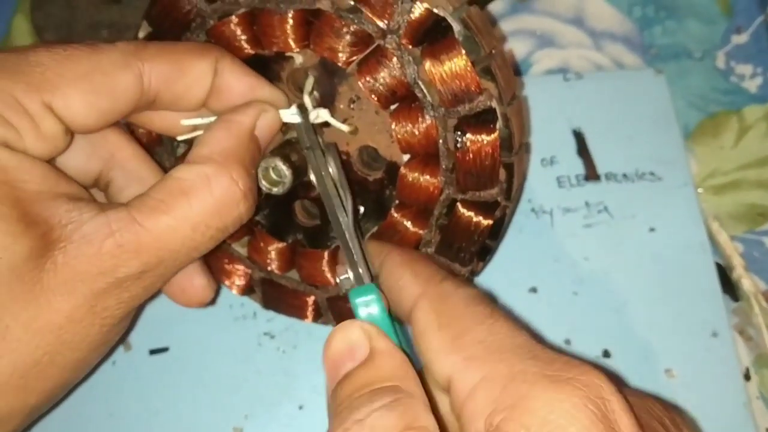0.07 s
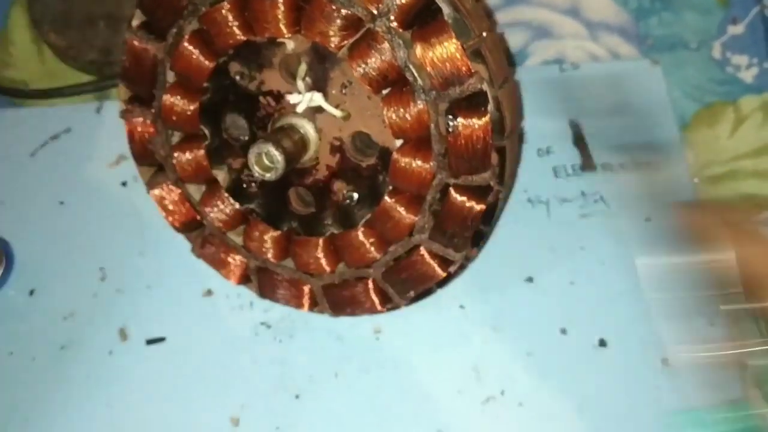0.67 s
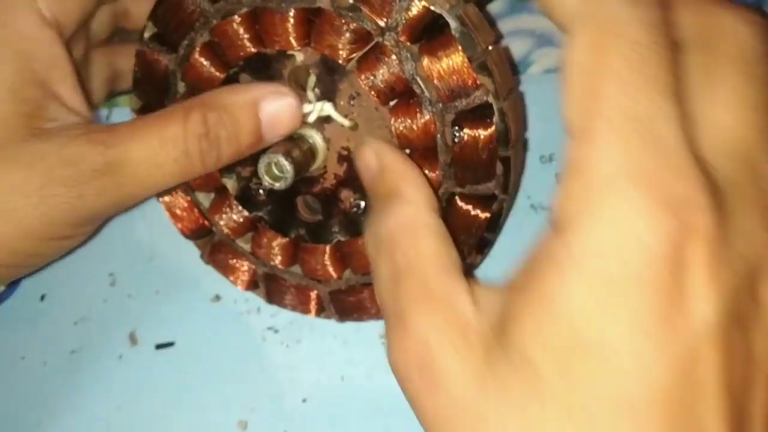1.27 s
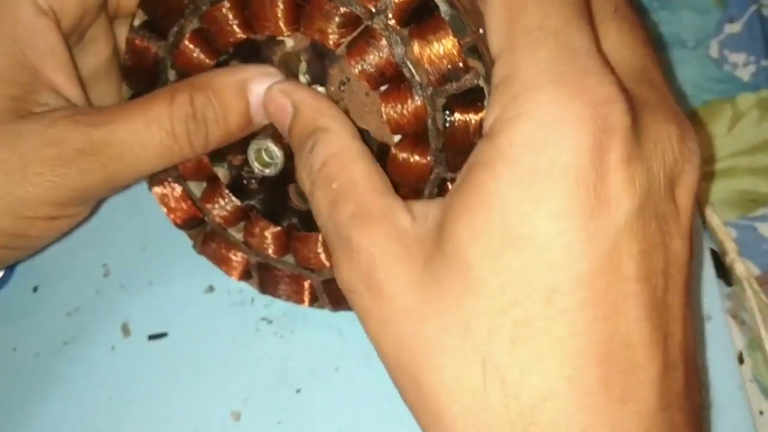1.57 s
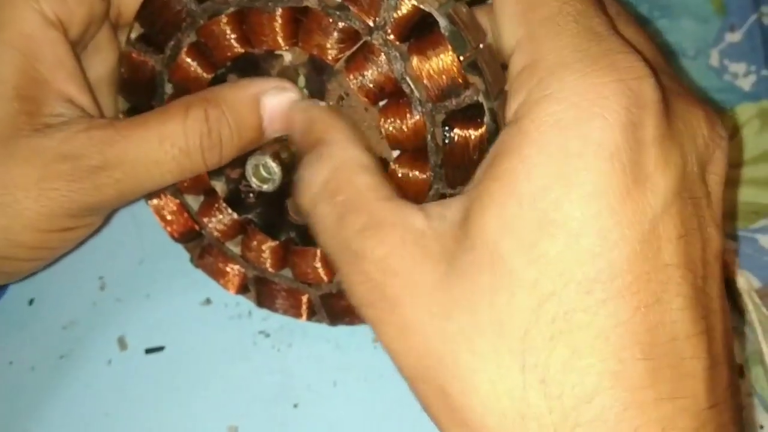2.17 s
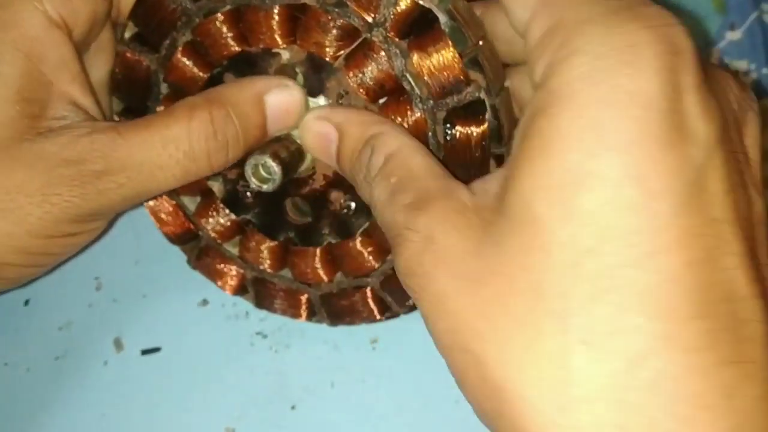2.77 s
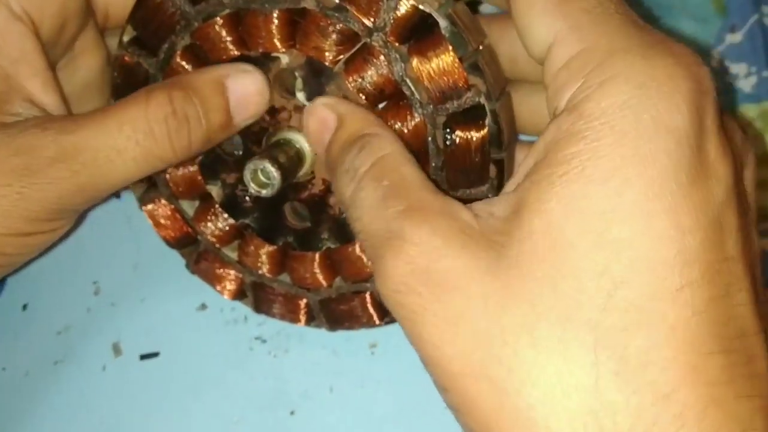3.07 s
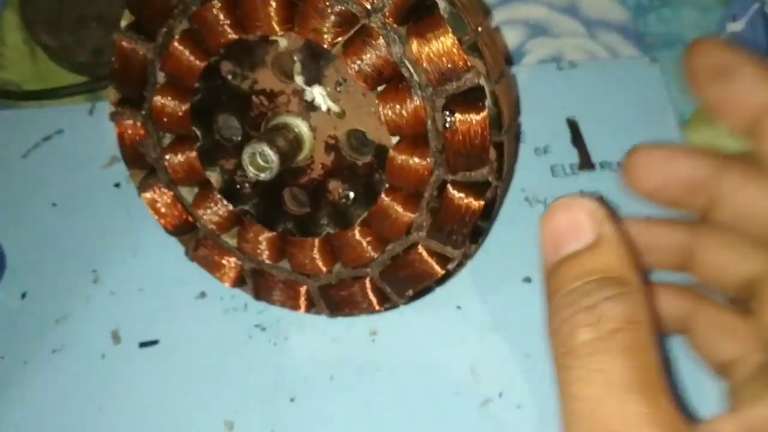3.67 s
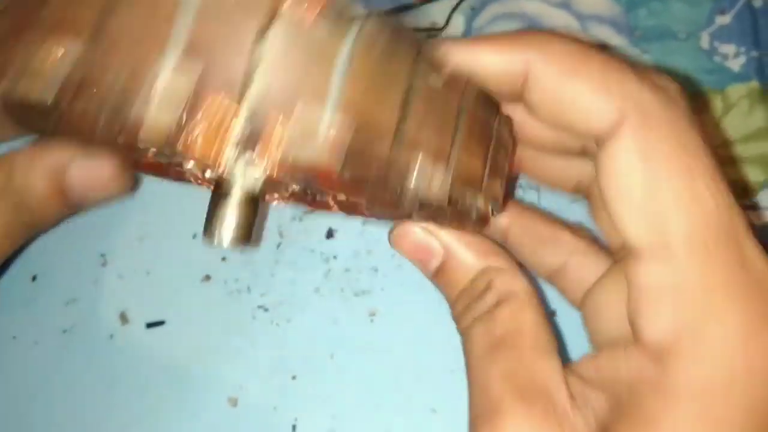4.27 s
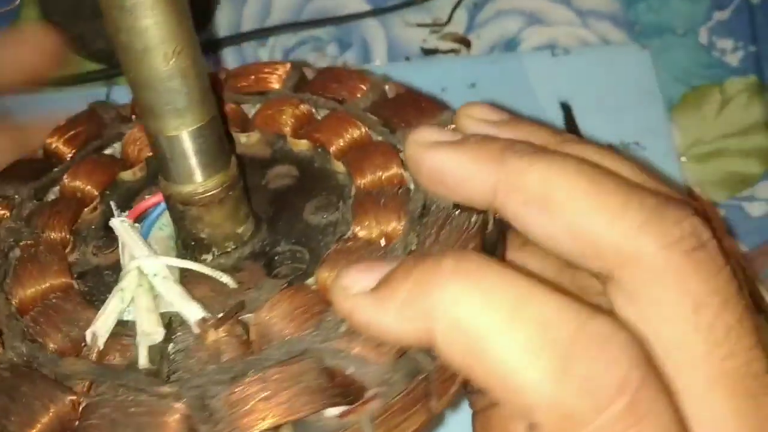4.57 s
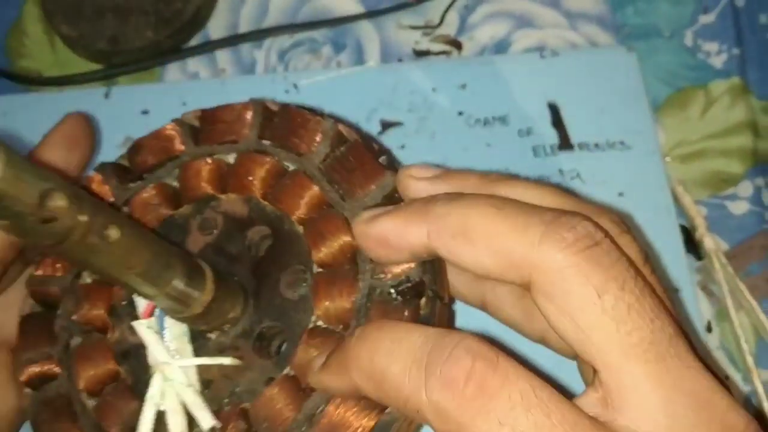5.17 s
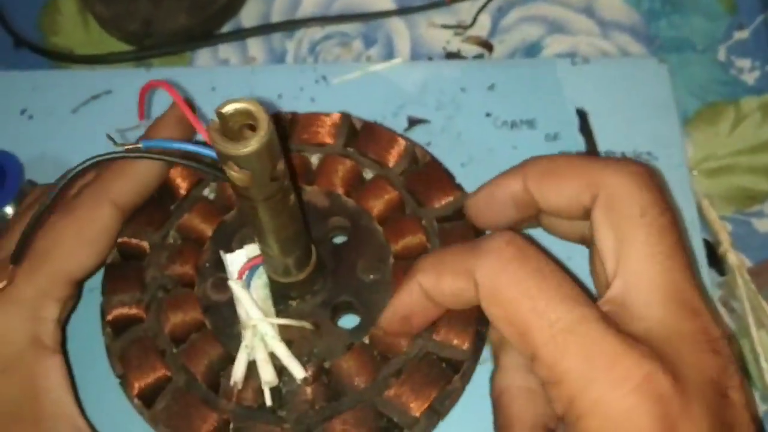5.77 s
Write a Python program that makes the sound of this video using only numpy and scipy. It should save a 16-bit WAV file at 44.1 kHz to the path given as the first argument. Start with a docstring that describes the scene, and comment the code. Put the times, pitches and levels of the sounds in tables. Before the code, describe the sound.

A few crisp scissor snips cut through a tie, and the scissors clatter onto a table with a low boom. Light taps, nail clicks and skin scuffs follow as a metal motor part is handled, clinks and is set down with a double thud. Everything is heard up close in stereo in a bare room, over dull far-off thumps, a faint wall clock and soft hiss.

```python
"""A table in a bare room, a stereo pair of microphones close to the work. First scissors snip and saw
through a tie on a fan motor's stator; at 1 s they drop on the table, which booms. Fingers press the
knot. From 4 s the stator is turned over, its steel core clinking; at 5.6 s it is set down and rocks
once. The room rings after the contacts. Throughout, dull thumps come from further off and a wall
clock ticks once a second, over low room rumble and microphone hiss."""
import sys
import numpy as np
from scipy import signal
from scipy.fft import rfft, irfft, next_fast_len
from scipy.io import wavfile
from scipy.ndimage import uniform_filter1d

SR = 44100
rng = np.random.default_rng(int(sys.argv[2]) if len(sys.argv) > 2 else 0)


def generate_wav(signal):
    """Clip the signal to [-1, 1] and save it as 16-bit WAV at the path in sys.argv[1]."""
    frames = np.transpose(np.atleast_2d(signal))
    scaled = np.clip(frames, -1, 1) * 32767
    pcm = np.round(scaled).astype(np.int16)
    wavfile.write(sys.argv[1], SR, pcm)


N = 265614
EVENT_SAMPLES = SR * 3 // 4  # one contact and its decay
T = np.arange(EVENT_SAMPLES) / SR

# the blades close on the cord: (time [s], level [dB], bite into the cord [dB])
BLADE_CLOSINGS = [(0.0952, -30.5, -16), (0.1730, -25, -18), (0.3798, -32, 0), (0.571, -32.5, -4.5)]
# the scissors touch the table, fall flat and bounce: (time [s], level [dB], room send [dB])
SCISSOR_DROPS = [(0.974, -30.5, 8), (0.989, -14, -3.5), (1.051, -37.5, 5)]
# hard knocks, one far off in the room, then the stator on the table:
# (time [s], level [dB], crack [dB], weight [dB], room [dB], ring [dB])
HARD_KNOCKS = [(1.877, -49.5, 0, -2, 9, -32), (4.094, -41, -6, -12, -8, -18),
               (4.2587, -25, 1.5, -16, -6.5, -20), (4.3336, -44, -1, -6, -25, -18),
               (4.602, -48, -10, -0.5, -10, -22), (5.5607, -27, -3, 6.5, -5, -10)]
# nails and wire ends on the stator: (time [s], level [dB], tilt [dB/octave], length [s], ring [dB])
NAIL_FLICKS = [(0.8552, -33, 3, 0.0027, -24), (1.4504, -29.5, -2, 0.0086, -2.5),
               (2.6172, -38, -0.5, 0.0037, -13.5), (4.185, -43, 8, 0.0032, -12),
               (4.461, -43, 10, 0.0036, -10), (4.583, -48.5, -10, 0.0038, -12),
               (4.802, -37, 15, 0.003, -12), (4.9683, -41, 11, .004, -18), (4.984, -32, 13, 0.0043, -21)]
# the rim taps the table: (time [s], level [dB])
RIM_TAPS = [(5.0134, -40), (5.024, -46)]
# soft low bumps, from fingers on the windings, handles on the table and a knock's body:
# (time [s], level [dB], pitch [Hz], tilt [dB/octave])
SOFT_BUMPS = [(0.762, -39, 342, 1), (0.784, -34, 314, 1.5), (0.966, -36.5, 516, 3), (0.977, -24, 180, -2),
              (1.879, -34.5, 374, 1), (2.31, -47.5, 296, -2), (2.556, -38, 257, -4), (3.422, -39, 477, 1),
              (3.497, -33.5, 447, -4), (3.651, -47, 434, 1), (3.746, -37.5, 336, 5), (3.774, -36, 284, -2),
              (3.925, -40, 450, 0.5), (4.549, -44, 400, 2), (4.996, -37, 375, -1.5), (5.501, -39, 384, 1)]
# blows that set the table booming: (time [s], level [dB], pitch [ratio], left over right [dB])
TABLE_BLOWS = [(0.997, -13.3, 1.0, -6), (4.260, -32.5, .96, -1)]
# the stator lands and rocks: (time [s], level [dB], tilt [dB/octave], thud [dB])
STATOR_LANDINGS = [(5.561, -17, 0, 3), (5.617, -21.5, 7, -4)]
# blades saw at the cord, then hands grip, turn and settle the stator: (start [s], end [s], level [dB])
SLIDE_STROKES = [(0.0, 0.726, -54), (1.44, 1.78, -64.5), (4.01, 4.453, -61), (4.78, 5.503, -58.5),
                 (5.597, 5.691, -49.5), (5.77, 5.81, -55), (5.972, 6.02, -54.5)]
# skin and cord brush the windings: (time [s], level [dB], half-width [s])
SKIN_SCUFFS = [(0.005, -43.5, 0.027), (1.4, -46.5, 0.0028), (2.47, -62, 0.037), (3.63, -47.5, 0.019),
               (4.059, -51.5, 0.023), (4.429, -47.5, 0.019), (4.838, -51, 0.034), (5.389, -44, 0.016)]
# blows further off: (time [s], level [dB], tilt [dB/octave])
FAR_BLOWS = [(0.162, -36.5, 0.5), (1.365, -32.5, 0.5), (2.78, -36.5, 0.5), (3.952, -33.5, -0.5),
             (5.173, -30, 0)]

# ringing modes: (frequency [Hz], level [dB], t60 before any added damping [s])
BLADE_MODES = [(1179, 1, .3), (1380, -1, .25), (2100, 1, .33), (2210, 2, .33), (3700, -6, .3),
               (5144, -2, .25), (5815, -3, .2), (6250, -2, .2), (7230, 1, .2), (8130, -7, .3),
               (9270, -8, .17), (10330, -6, .14), (12000, -10, .13), (14000, -11, .1)]  # the scissors' steel
PING_MODES = [(2230, 0, .06), (2570, -2, .06), (4640, -10, .05)]  # the blades under a deep bite
CORE_MODES = [(3300, -8, .06), (4592, -13, .25), (5000, -4, .07), (5803, -5, .17), (6255, -6, .18),
              (7074, 0, .12), (8250, -6, .08), (8990, -3, .17), (10330, -3, .06), (11570, -7, .17),
              (12120, -1, .07), (13060, -5, .17), (13900, -5, .08)]  # the stator's steel core
TABLE_MODES = [(231, 0, .37), (211, -5.5, .48), (246, -10, .18), (178, -19, .3), (292, -12, .3),
               (322, -18, .3), (435, -17, .25), (535, -21, .25), (775, -22, .25)]  # the table top
STATOR_MODES = [(161, -14.5, .48), (243, -7, .28), (285, -6, .32), (377, 1, .2), (425, -6, .12),
                (517, -7, .22), (706, -12, .12), (953, -11, .17), (1184, -10, .16), (1225, 6, .04),
                (1620, -12, .07), (1980, -12, .025)]  # the whole stator on the table
HOLLOW_MODES = [(186, -1, .5), (327, 6, .3), (430, 3, .24), (520, -5, .28), (706, -7, .38), (954, -9, .25)]  # the ring of the far thumps
CLOCK_MODES = [(900, -6, 0.24), (1360, 10, 0.46), (1850, -13, .35), (1990, -6, .3), (5200, -10, .3)]  # the clock's case

# spectral shapes: (frequency [Hz], relative level [dB])
CRACK_EQ = [(30, -100), (1500, -92), (3000, -2.5), (4200, -6), (6300, 3.5), (9000, 5.5), (13000, 7),
            (15500, 1.5), (17000, 1)]  # a hard, bright contact
EDGE_EQ = [(4800, -24), (5600, 0), (6200, 4), (6800, 1), (9300, -47), (11500, 5.5), (13000, -9),
           (16000, -17)]  # the cutting edges meet
CRUNCH_EQ = [(200, -15), (1000, -8.5), (1800, -3.5), (2230, 2), (2400, 1), (2580, 3.5), (2850, -2),
             (3250, -9), (4100, -8), (4640, -4), (5300, -20), (12000, -30)]  # cord fibres part
CLINK_EQ = [(30, -37), (500, -5), (1250, 1.5), (1750, -4), (2200, 1.5), (2450, -5), (2850, -2.5),
            (3600, -6), (4500, -9), (5200, -2), (6000, -10), (12000, -13.5)]  # struck metal
PUSH_EQ = [(30, -16), (80, -26.5), (130, -16), (220, 2.5), (420, 4.5), (800, 0.5), (1400, -14),
           (4000, -32.5)]  # the low body of a contact
CLACK_EQ = [(200, -25), (900, -20), (1400, 12), (1900, -9), (2800, 1), (4500, -32), (12000, -10)]  # rim on table
SCRAPE_EQ = [(400, 5.5), (1000, 5), (2000, 2), (4500, -1), (7000, -8.5), (15000, -32)]  # the midrange of friction
SWISH_EQ = [(3000, -12), (5200, -2.5), (7000, -5.5), (12000, -3), (15500, -4)]  # the treble of friction
THUMP_EQ = [(40, -46), (100, -26.5), (170, -3), (240, -7.5), (330, 3), (450, -3), (600, -5.5), (900, -11.5),
            (1300, -18.5), (2000, -29), (3200, -38.5), (8000, -62)]  # a far blow
TICK_EQ = [(300, -73), (700, -4), (900, 3.5), (1200, -2), (1700, 4.5), (2600, 0), (4000, -3.5), (5200, 2),
           (6500, -9.5), (9000, -7.5), (15000, -33)]  # the clock
RUMBLE_EQ = [(25, -101), (70, -13), (120, -15), (170, 3.5), (210, 8), (300, 4), (450, 0), (700, -7),
             (1200, -18.5), (3000, -21.5)]  # the room at rest
HISS_EQ = [(410, -58), (700, -0.5), (1300, -1), (1830, -2), (2030, -4), (2220, -3), (3110, -3.5),
           (15500, -5)]  # the microphones' own noise

# reverberation of the bare room: (frequency [Hz], t60 [s])
ROOM_DECAY = [(150, 0.78), (400, 0.4), (1000, 0.48), (2500, 0.38), (7000, 0.35), (15000, 0.25)]
# likeness of diffuse sound at the two microphones: (frequency [Hz], correlation [ratio])
MIC_COHERENCE = [(100, 0.92), (300, 0.85), (550, 0.2), (1000, 0.004), (15000, 0.021)]
# stereo balance of close contacts: (frequency [Hz], left over right [dB])
CLOSE_BALANCE = [(130, 2), (300, 0), (1200, -0.5), (4000, -1), (12000, 1)]


def snips():
    """Close up, the blades crack shut and the hand damps their ring; a deep bite crunches the cord."""
    out = np.zeros((2, N))
    for s, db, bite_db in BLADE_CLOSINGS:
        hit = table_echo(burst(CRACK_EQ, life_s=.0037, tilt_db=3), delay_s=.00047)
        hit += amp(-7) * steel(BLADE_MODES, tilt_db=7, damping=14)
        edges = amp(-4) * burst(EDGE_EQ, life_s=.0054) / (1 + amp(bite_db))  # cord muffles the edges
        push = amp(-18) * burst(PUSH_EQ, life_s=.0024)
        crunch = amp(bite_db) * (burst(CRUNCH_EQ, life_s=.0057) + amp(-7) * steel(PING_MODES))
        heard = in_room(hit + edges + push, room_db=-10, rise_s=.008)
        heard += in_room(crunch, room_db=-15, rise_s=.0066)
        add(out, s, amp(db) * pan(heard, left_db=-.5))
    return out


def sawing(start_s=.385, end_s=.68, level_db=-53):
    """After the deep bite the fibres keep parting under the edges, with the colour of the crunch."""
    fibres = stroke(start_s, end_s) * slips(grain_db=1.5, samples=200)
    return amp(level_db) * fibres * colour(noise(N), CRUNCH_EQ, tilt_db=-2)


def scissors_down(echo_s=.00052):
    """Dropped a little to the right, the scissors crack, clink and ring; the table damps the blades."""
    out = np.zeros((2, N))
    for s, db, room_db in SCISSOR_DROPS:
        crack = amp(-5) * table_echo(burst(CRACK_EQ, life_s=.0055, tilt_db=-2.5), echo_s)
        body = table_echo(burst(CLINK_EQ, life_s=.0053), echo_s)
        body += amp(-13) * burst(PUSH_EQ, life_s=.017)
        body += amp(-19) * steel(BLADE_MODES, damping=2.6)
        heard = in_room(crack, room_db - 6, rise_s=.026)
        heard += pan(in_room(body, room_db, rise_s=.026), left_db=-2)
        add(out, s, amp(db) * heard)
    return out


def table_booms():
    """The struck table top booms, slightly sharp at first; its close modes beat as it dies."""
    out = np.zeros((2, N))
    for s, db, ratio, left_db in TABLE_BLOWS:
        boom = ring(TABLE_MODES, ratio, attack_s=.018, sag=.06)
        add(out, s, amp(db) * pan(boom, left_db))
    return out


def stator_landing(thud_hz=392, thud_s=.0125):
    """The heavy stator lands with a thud that lasts while it presses in, then rings and rocks once."""
    out = np.zeros((2, N))
    thud = np.sin(2 * np.pi * thud_hz * T) * np.exp(-(T / thud_s) ** 8)
    for s, db, tilt_db, thud_db in STATOR_LANDINGS:
        knock = ring(STATOR_MODES, tilt_db=tilt_db, attack_s=.0049) + amp(thud_db) * thud
        add(out, s, amp(db) * in_room(knock, room_db=-11, rise_s=.014))
    return out


def hard_knocks():
    """A hard contact gives a crack, a clink and a steel ring; the weight behind it adds a low push."""
    out = np.zeros((2, N))
    for s, db, crack_db, weight_db, room_db, ring_db in HARD_KNOCKS:
        crack = amp(crack_db) * burst(CRACK_EQ, life_s=.0026, tilt_db=-5)
        clink = amp(-1) * burst(CLINK_EQ, life_s=.0064)
        push = amp(weight_db) * burst(PUSH_EQ, life_s=.0087)
        metal = amp(ring_db - 7) * steel(CORE_MODES)
        hit = table_echo(crack + clink, delay_s=.0005) + push + metal
        add(out, s, amp(db) * in_room(hit, room_db, rise_s=.0096))
    return out


def nail_flicks():
    """A nail or wire end gives a thin crack with a little body; a firm flick rings the core."""
    out = np.zeros((2, N))
    for s, db, tilt_db, life_s, ring_db in NAIL_FLICKS:
        crack = table_echo(burst(CRACK_EQ, life_s, tilt_db), delay_s=.00028)
        push = amp(-19) * burst(PUSH_EQ, life_s=.022, tilt_db=-3)
        metal = amp(ring_db - 6) * (steel(CORE_MODES) + burst(CLINK_EQ, life_s))
        add(out, s, amp(db) * in_room(crack + push + metal, room_db=-10, rise_s=.013))
    return out


def rim_taps():
    """The rim of the stator taps the table: a small dry clack."""
    out = np.zeros((2, N))
    for s, db in RIM_TAPS:
        add(out, s, amp(db) * in_room(burst(CLACK_EQ, life_s=.0037), room_db=-9))
    return out


def soft_bumps(t60_s=.066, attack_s=.0023):
    """A soft contact gives a few damped cycles and a dull puff."""
    out = np.zeros((2, N))
    fade = amp(-60 * T / t60_s) * (1 - np.exp(-T / attack_s))
    for s, db, hz, tilt_db in SOFT_BUMPS:
        tone = np.sin(2 * np.pi * hz * T) * fade
        puff = amp(-6) * burst(PUSH_EQ, life_s=.0049, tilt_db=tilt_db)
        add(out, s, amp(db) * in_room(tone + puff, room_db=-10))
    return out


def sliding():
    """Skin and blades slide over cord and copper in small slips."""
    strokes = sum(amp(db) * stroke(start, end) for start, end, db in SLIDE_STROKES)
    grip = slips(grain_db=3, samples=120)
    friction = colour(noise(N), SCRAPE_EQ) + amp(-4) * colour(noise(N), SWISH_EQ)
    return strokes * grip * friction


def scuffs():
    """Each scuff on the windings swells and fades as a cluster of tiny slips."""
    t = np.arange(N) / SR
    swell = sum(amp(db) * np.exp(-((t - s) / width) ** 2 / 2) for s, db, width in SKIN_SCUFFS)
    return swell * slips(grain_db=3, samples=60) * colour(noise(N), SWISH_EQ)


def far_thumps(echo_s=.1):
    """Far blows reach the microphones as dull, hollow reverberation; one distinct echo follows each."""
    out = np.zeros((2, N))
    for s, db, tilt_db in FAR_BLOWS:
        hollow = amp(-3) * ring(HOLLOW_MODES, attack_s=.012, spread_db=8.5)
        add(out, s, amp(db) * (wash(THUMP_EQ, rise_s=.023, tilt_db=tilt_db) + hollow))
        add(out, s + echo_s, amp(db + 2) * burst(THUMP_EQ, life_s=.0011, tilt_db=-6))
    return out


def wall_clock(first_s=.722, period_s=1.001, lead_s=.022, level_db=-51):
    """Off on the wall, a light catch leads each step; the room smears the tick and the case's ring."""
    out = np.zeros((2, N))
    for s in np.arange(first_s, N / SR, period_s):
        catch = amp(-6) * wash(TICK_EQ, rise_s=.013)
        step = wash(TICK_EQ, rise_s=.013)
        case = amp(-13) * ring(CLOCK_MODES, attack_s=.027, spread_db=4)
        add(out, s - lead_s, catch)
        add(out, s, step + case)
    return amp(level_db) * out * slips(grain_db=1, samples=150)  # the level flickers slightly


def room_tone(rumble_db=-57, waver_db=.3, hiss_db=-59.5):
    """The low rumble of the room wavers a little, under steady microphone hiss."""
    drift = unit(signal.resample(rng.standard_normal(40), N))
    rumble = amp(rumble_db - waver_db * drift) * colour(noise(N), RUMBLE_EQ)
    return rumble + amp(hiss_db) * colour(noise(N), HISS_EQ)


def burst(spectrum, life_s, tilt_db=0, samples=2048):
    """A few milliseconds of coloured chatter between two surfaces, rms 1 over its life."""
    fade = np.exp(-(T[:samples] / life_s) ** 2)
    chatter = unit(colour(noise(samples) * fade, spectrum, tilt_db)) * np.sqrt(life_s * SR / samples)
    return np.pad(chatter, ((0, 0), (0, EVENT_SAMPLES - samples)))


def ring(modes, ratio=1, tilt_db=0, attack_s=.001, spread_db=1, damping=1, sag=0, sag_s=.12):
    """Damped modes, struck at new strengths each time; the pitch starts sharp by the share `sag`."""
    hz, db, t60 = np.transpose(modes)[:, :, None]
    gain = amp(db + tilt_db * np.log2(hz) + spread_db * rng.standard_normal(hz.shape))
    gain *= np.linalg.norm(amp(db)) / np.linalg.norm(gain)  # energy only shifts between modes
    warped_time = T + sag * sag_s * (1 - np.exp(-T / sag_s))
    partials = gain * amp(-60 * damping * T / t60) * np.sin(2 * np.pi * ratio * hz * warped_time)
    return partials.sum(0) * (1 - np.exp(-T / attack_s))


def steel(modes, tilt_db=0, damping=1):
    """The ring of steel; each microphone hears the modes at its own strengths and delay."""
    pair = [ring(modes, tilt_db=tilt_db, attack_s=.0004, spread_db=3, damping=damping) for _ in range(2)]
    return np.array([np.roll(side, rng.integers(20)) for side in pair])


def slips(grain_db, samples):
    """A flickering gain of rms 1, like the uneven grip of friction."""
    grain = unit(uniform_filter1d(rng.standard_normal(N), size=samples))
    return unit(amp(grain_db * grain))


def stroke(start_s, end_s, attack_s=.04, release_s=.09):
    """The envelope of a stroke: it rises, holds and dies away."""
    t = np.arange(N) / SR
    return np.clip((t - start_s) / attack_s, 0, 1) * np.exp(-np.maximum(t - end_s, 0) / release_s)


def table_echo(x, delay_s, strength=.45):
    """The table top returns a click a moment later and combs its spectrum."""
    echo = np.roll(x, round(delay_s * SR), axis=-1)
    return (x + strength * echo) / np.hypot(1, strength)


def room_tail(rise_s):
    """A fresh room response of energy 1: it builds up, then each frequency dies at its own speed."""
    hz, t, bands = signal.stft(noise(EVENT_SAMPLES), SR, nperseg=256)
    decay = amp(-60 * t / along(ROOM_DECAY, hz)[:, None])
    tail = signal.istft(bands * decay, SR, nperseg=256)[1][:, :EVENT_SAMPLES]
    build_up = 1 - np.exp(-(T / rise_s) ** 2)
    return unit(tail * build_up) / np.sqrt(EVENT_SAMPLES)


def in_room(x, room_db, rise_s=.017):
    """The direct sound at the microphones, followed by the answer of the walls."""
    reverb = signal.fftconvolve(np.atleast_2d(x), room_tail(rise_s), axes=1)[:, :EVENT_SAMPLES]
    return x + amp(room_db) * reverb


def wash(spectrum, rise_s, tilt_db=0):
    """A blow so far from the microphones that only its reverberation is heard."""
    return colour(room_tail(rise_s), spectrum, tilt_db) * np.sqrt(SR / 20)


def noise(samples):
    """Diffuse white noise at two microphones: alike in the bass, unrelated in the treble."""
    m = next_fast_len(samples)
    coherence = along(MIC_COHERENCE, np.fft.rfftfreq(m, 1 / SR))
    angle = np.arccos(np.clip(coherence, -1, 1)) / 2
    white = rfft(rng.standard_normal((2, m)))
    mid, side = irfft(white * [np.cos(angle), np.sin(angle)], m)[:, :samples]
    return np.array([mid + side, mid - side])


def close_pair(x):
    """Each microphone hears the close contacts with its own colour."""
    m = next_fast_len(N + SR // 2)
    half_db = along(CLOSE_BALANCE, np.fft.rfftfreq(m, 1 / SR)) / 2
    return irfft(rfft(x, m) * amp([half_db, -half_db]), m)[:, :N]


def pan(x, left_db):
    """Set the left microphone's level against the right; negative leans right."""
    return x * amp([[left_db / 2], [-left_db / 2]])


def colour(x, spectrum, tilt_db=0):
    """Causal filter of unit power gain with the given spectrum, tilted per octave."""
    n = x.shape[-1]
    m = 2 * next_fast_len(n // 2 + 1024)
    hz = np.fft.rfftfreq(m, 1 / SR)
    gain = unit(amp(along(spectrum, hz) + tilt_db * np.log2(hz + 20)))
    cepstrum = irfft(np.log(gain + 1e-6))
    cepstrum[1:m // 2] *= 2  # fold to minimum phase, so attacks stay sharp
    cepstrum[m // 2 + 1:] = 0
    return irfft(rfft(x, m) * np.exp(rfft(cepstrum)), m)[..., :n]


def amp(db):
    """Decibels to gain."""
    return 10 ** (np.asarray(db) / 20)


def unit(x):
    """Scale to rms 1."""
    return x / np.sqrt(np.mean(x ** 2) + 1e-20)


def along(points, hz):
    """Read (frequency [Hz], value) points on a log axis."""
    point_hz, values = np.transpose(points)
    return np.interp(np.log(hz + 1), np.log(point_hz + 1), values)


def add(track, s, sound):
    """Mix a sound into the track at time s."""
    start = max(0, round(s * SR))
    part = sound[..., :N - start]
    track[:, start:start + part.shape[-1]] += part


def scene():
    """At the two microphones: the work on the table close up, the room behind it."""
    contacts = snips() + scissors_down() + hard_knocks() + nail_flicks() + rim_taps()
    contacts += soft_bumps() + table_booms() + stator_landing()
    friction = sliding() + sawing() + scuffs()
    return close_pair(contacts) + friction + far_thumps() + wall_clock() + room_tone()


def record(dry, low_hz=90, top_hz=15700):
    """Small microphones lose the deep bass; the recorder keeps nothing above its band limit."""
    thin = signal.sosfilt(signal.butter(2, low_hz, "highpass", fs=SR, output="sos"), dry)
    m = next_fast_len(N + SR // 2)
    in_band = np.fft.rfftfreq(m, 1 / SR) < top_hz
    return irfft(rfft(thin, m) * in_band, m)[:, :N]


dry = scene()
out = record(dry)
generate_wav(out)
```